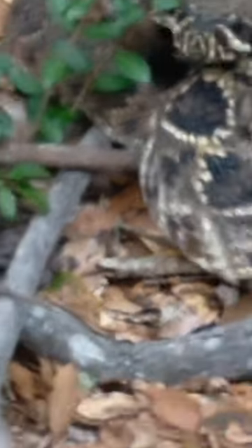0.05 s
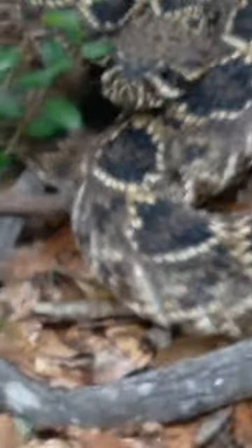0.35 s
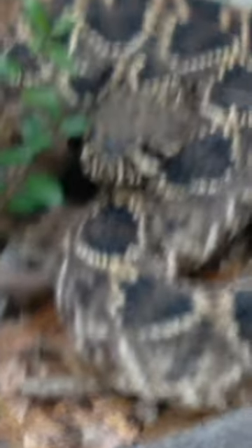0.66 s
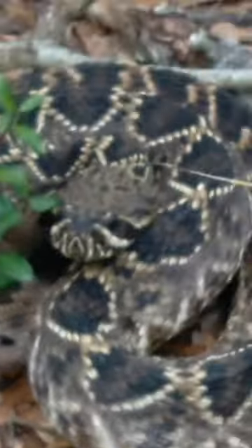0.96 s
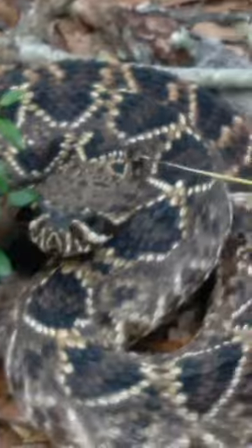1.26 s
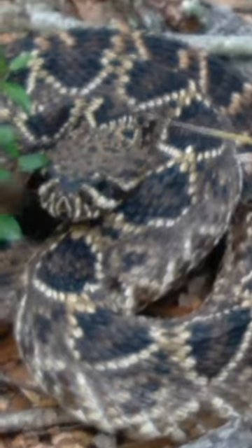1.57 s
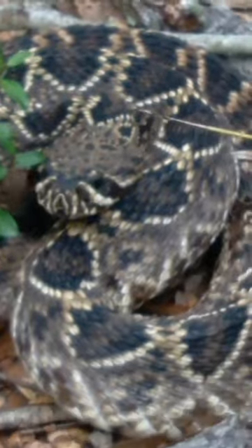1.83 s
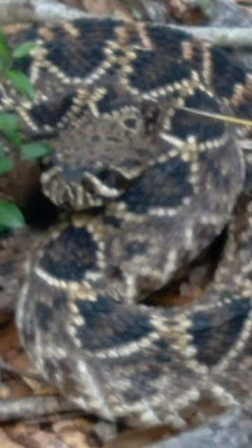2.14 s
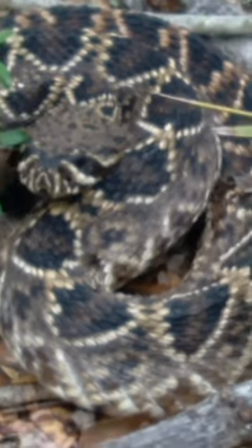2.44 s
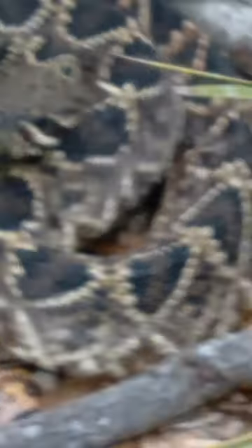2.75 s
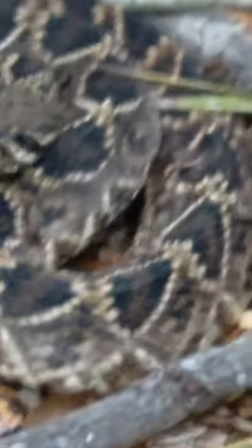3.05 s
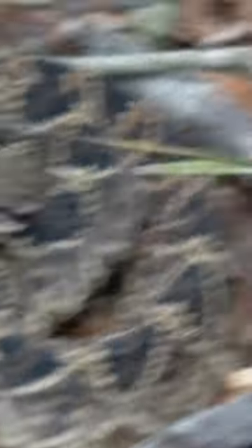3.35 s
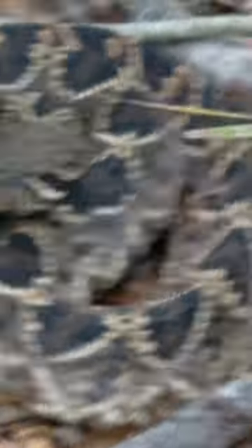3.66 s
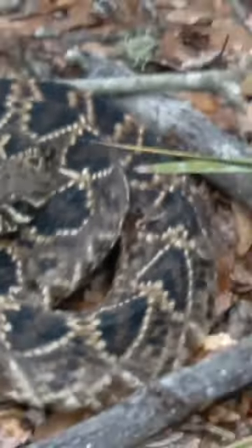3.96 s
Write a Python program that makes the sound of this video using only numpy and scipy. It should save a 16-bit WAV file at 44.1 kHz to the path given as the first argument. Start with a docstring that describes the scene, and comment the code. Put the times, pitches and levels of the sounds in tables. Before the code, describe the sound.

Close up outdoors, a rattlesnake's dry, hissing rattle buzzes without pause, easing slightly as it goes. Two short snaps and a faint leaf rustle come at the start; later a hand knocks and rubs the microphone.

```python
"""Outdoors in dry leaf litter, a hand-held microphone close to a coiled rattlesnake.
Each shake of the tail throws the hollow horny segments together twice: a fizz of tiny clicks
that ring in the shells. Litter snaps, crackles and rustles; a faint hum hangs far off.
Near 3 s the microphone swings round to another side, and the hand bumps and rubs its housing."""
import sys
import numpy as np
from scipy import signal
from scipy.fft import rfft, irfft
from scipy.io import wavfile

SR = 44100
rng = np.random.default_rng(int(sys.argv[2]) if len(sys.argv) > 2 else 0)


def store_wav(level_fs):
    """Save 16-bit WAV to argv[1]."""
    pcm = np.round(np.clip(np.atleast_2d(level_fs), -1, 1) * 32767)
    wavfile.write(sys.argv[1], SR, pcm.T.astype(np.int16))


N = 176400
T = np.arange(N) / SR


def rattle():
    """The rattle, close up: segments click under each stroke; the colour shifts as the microphone moves."""
    # broad colour from the first position, and from the side: f/Hz, level/dB
    front_colour = [(600, -36), (1080, -16), (1400, -27), (1800, -25), (2500, -14.5), (2850, -18),
                    (3400, -9.5), (3850, -4), (5000, -2.5), (5700, -5), (7000, 2), (8100, 2), (9000, -3),
                    (12000, -17), (14000, -17), (15800, -17.5)]
    side_colour = [(580, -27), (790, -10), (1100, -26), (1700, -22.5), (2500, -12.5), (3300, -7),
                   (3900, -3), (4400, -4), (5300, -2.5), (6100, -8), (7300, 1.5), (8400, 3.5), (9800, -8),
                   (11700, -14.5), (12700, -11.5), (15800, -16.5)]
    # crossovers between four bands: f/Hz
    band_edges = [3453, 6320, 10300]
    # band levels: t/s, low/dB, middle/dB, treble/dB, top/dB
    band_levels = [(0, -63.5, -51.5, -42, -52), (.3, -61.5, -50, -48, -50), (.6, -61.5, -50.5, -49, -52.5),
                   (.8, -59, -50.5, -46, -51), (1.1, -59.5, -49.5, -47.5, -52.5),
                   (1.45, -62, -50.5, -50.5, -56), (1.9, -62.5, -50, -50.5, -56.5),
                   (2.2, -64, -49.5, -53, -62.5), (2.45, -71.5, -53, -55, -64),
                   (2.8, -70.5, -54, -58.5, -62.5), (3.08, -75, -59.5, -52.5, -61.5),
                   (3.19, -62.5, -52, -58.5, -65), (3.26, -60.5, -53.5, -51.5, -63),
                   (3.36, -66.5, -55, -56.5, -65), (3.55, -63.5, -55, -56.5, -63.5),
                   (3.75, -69.5, -56, -55, -60.5), (4, -81, -57.5, -54, -59)]
    mid_swing_s, swing_takes_s = 2.91, .29
    aside = np.clip((T - mid_swing_s) / swing_takes_s + .5, 0, 1)
    clicks = grains(per_s=12000, spread_db=5) * strokes() * clacks()
    clicks *= from_db(.6 * drift(per_s=16))  # slight surges
    clicks = scattered(clicks, unsteady=1 + 2.9 * aside, count=8)  # less steady after the swing
    rings = shells(clicks)
    buzz = (1 - aside) * rms_one(coloured(rings, front_colour))
    buzz += aside * rms_one(coloured(rings, side_colour))
    lowpassed = [below(buzz, hz, order=8) for hz in band_edges]
    bands = np.diff([np.zeros(N), *lowpassed, buzz], axis=0)
    buzz = sum(from_db(db) * rms_one(band) for db, band in zip(in_time(band_levels), bands))
    return sliding_dip(buzz)


def strokes():
    """Force on the segments: a strong and a weak stroke per shake, with a flutter beating against them."""
    # tail speed: t/s, shake rate/Hz
    tail_speed = [(0.0, 41.17), (0.12, 37.34), (0.25, 38.37), (0.4, 40.62), (0.6, 38.48), (0.8, 39.34),
                  (1.0, 38.74), (1.2, 38.4), (1.45, 37.45), (1.7, 37.64), (2.0, 37.2), (2.3, 37.46),
                  (2.6, 36.79), (2.9, 37.03), (3.2, 37.17), (3.6, 36.8), (4.0, 36.56)]
    # the two strokes of a shake: place/cycles, half width/cycles, relative level/dB
    stroke_pair = [(0.99, 0.15, 3), (0.46, 0.24, -2)]
    # flutter: t/s, depth/dB
    flutter_depth = [(0, .3), (1.2, .5), (1.5, 1.4), (3.5, 2.1)]
    flutter_hz, stroke_spread_db = 59.38, .7
    cycles = np.cumsum(in_time(tail_speed)[0]) / SR - .1
    force = from_db(-4.5)  # loose segments keep clicking between strokes
    for place, width, db in stroke_pair:
        phase = cycles - place + 1.5
        strengths = from_db(db + stroke_spread_db * rng.standard_normal(400))
        pulse = np.exp(-np.abs((phase % 1 - .5) / width) ** 3)
        force = force + strengths[phase.astype(int)] * pulse
    flutter_db = in_time(flutter_depth)[0] * np.cos(2 * np.pi * (flutter_hz * T + .45))
    return rms_one(force * from_db(flutter_db))


def clacks():
    """Brief extra force where the segments meet hard."""
    # harder strokes: t/s, lift/dB
    hard_strokes = [(.415, 3), (1.08, 3), (1.472, 1.5), (1.872, 3), (2.11, 8.5), (2.433, 4), (3.487, 6.5),
                    (3.54, 8)]
    return 1 + sum((from_db(db) - 1) * swell(s, span_s=.002) for s, db in hard_strokes)


def shells(clicks):
    """Clicks ring in the hollow segments; each resonance swells and fades as tail and microphone turn."""
    # segment resonances: f/Hz, width/Hz, lift/dB, strongest at t/s, fade/s
    modes = [(2470, 71, 4, 0.39, .3), (2630, 62, 9, 1.8, 0.46), (3030, 49, 7.5, 1.34, 0.94),
             (3724, 43, 6.5, 1.14, 0.7), (3640, 50, 6, 3.6, 0.37), (3876, 70, 7, 1.6, 2.9),
             (4040, 190, 10.5, 3.2, 0.15), (4040, 100, 5, 0.15, 0.16), (4190, 145, 8.5, 0.77, 0.47),
             (4694, 57, 2, .52, .15), (4843, 84, 7.5, 2.5, 1.9), (5060, 46, 12, 1, .35),
             (5140, 94, 10.5, 3.95, 0.19), (5250, 150, 8, 4, 1.5), (5880, 75, 10, 2.3, 0.33),
             (6200, 180, 9, 3.03, .15), (6600, 48, 7, 0.78, 0.25), (6804, 91, 15, 4.23, 0.2),
             (6820, 110, 9, 1.84, .6), (6900, 60, 14, .48, 0.13), (7330, 140, 12.5, 3.48, 0.22),
             (7660, 125, 8.5, 1.6, 1.4), (7660, 95, 8.5, 3.59, 0.12), (7900, 94, 5.5, 0.41, .2),
             (8000, 47, 10, 1.9, 0.66), (8190, 80, 11.5, 0.7, 0.68), (8430, 47, 12.5, 3.25, 0.17),
             (8527, 60, 6, 2, 0.37), (9300, 89, 7, 3.4, .3), (9200, 70, 6, 3.55, 0.27),
             (9259, 120, 9, 2.63, 0.25), (9200, 60, 6, 1.7, .5), (10700, 180, 13, 3.37, 0.22),
             (11470, 70, 15, 3.36, 0.3), (12187, 90, 12, 3.4, 0.25), (12575, 150, 10.5, 3.65, 0.41),
             (13150, 170, 11, 4.7, 0.28), (14500, 140, 12.5, 3.3, .38)]
    return clicks + sum((from_db(db) - 1) * swell(s, span_s) * resonance(clicks, hz, width_hz)
                        for hz, width_hz, db, s, span_s in modes)


def scattered(x, unsteady, count):
    """Twigs and leaves return weak, short echoes whose paths wander as the hand moves."""
    longest_s, echo_db = .004, -6
    echoes = np.zeros(N)
    for _ in range(count):
        polarity = rng.choice([-1, 1])
        delay_s = rng.uniform(.1003, 1) * longest_s
        wander_s = .00003 * unsteady * drift(per_s=2)
        echoes += polarity * np.interp(T - delay_s - wander_s, T, x)
    return x + from_db(echo_db) * echoes / np.sqrt(count)


def sliding_dip(x, width_hz=2000, block=256):
    """A slight treble lift turns into a broad phasing dip that slides down through the buzz."""
    # path of the dip: t/s, centre f/Hz, gain/dB
    glide = [(2.15, 9150, 2), (2.33, 7850, -5.5), (2.55, 6900, -2), (2.8, 5560, -5.5), (3.0, 4430, -1),
             (3.12, 4000, -4)]
    hz, db = in_time(glide)
    state, band = np.zeros(2), np.zeros(N)
    for i in range(0, N, block):
        band[i:i + block], state = signal.lfilter(*resonator(hz[i], width_hz), x[i:i + block], zi=state)
    return x + (from_db(db) - 1) * band


def snaps():
    """Dry fibres in the litter break in a short burst: a bright crack over a woody ring."""
    # breaks: t/s, peak/dB, t60/s, wood against crack/dB
    breaks = [(0.0976, -21.5, 0.034, -6), (.8831, -11, 0.0051, -12.5), (0.8843, -19, 0.0077, -7.5)]
    # colours of the crack and of the wood: f/Hz, level/dB
    crack_colour = [(4000, -37), (5800, -26), (7300, -5.5), (8800, 1), (10500, -6), (13000, -16),
                    (15800, -18)]
    wood_colour = [(150, -53), (400, -19), (1000, -3.5), (1750, 2), (2100, -6), (2550, 9), (3100, 1),
                   (3950, 4), (4800, 5), (6000, -10.5)]
    out = np.zeros(N)
    for s, db, t60, wood_db in breaks:
        burst = noise_burst(s, t60)
        crack = rms_one(coloured(burst, crack_colour))
        wood = from_db(wood_db) * rms_one(coloured(burst, wood_colour))
        out += peak_at(crack + wood, db)
    return out


def crackles(width_hz=1260):
    """Dead leaves buckle: short, dull bursts, each around its own pitch."""
    # single leaves: t/s, peak/dB, f/Hz
    leaves = [(0.134, -42, 935), (.141, -51, 1150), (0.25, -47, 1500), (0.298, -52, 905),
              (.378, -44.5, 1620), (.414, -48, 2210), (0.693, -49, 780)]
    out = np.zeros(N)
    for s, db, hz in leaves:
        leaf = resonance(noise_burst(s, t60=.029), hz, width_hz)
        out += peak_at(resonance(leaf, hz, width_hz), db)
    return out


def handling():
    """Handling noise: soft knocks ring briefly in the microphone housing, over the rumble of the grip. The
    earliest short tap, at 0.32 s, is a leaf crackling in the litter."""
    # a leaf crackle at 0.32 s, then knocks of the hand: t/s, peak/dB, f/Hz, t60/s
    knocks = [(0.319, -42.5, 437, 0.0093), (2.859, -45, 700, 0.0015), (2.898, -31, 97.4, 0.088),
              (2.976, -35.5, 99, 0.045), (3.020, -42, 160, 0.04), (3.105, -44, 275, 0.02),
              (3.6007, -33.5, 900, 0.00098), (3.673, -37.5, 260, 0.011), (3.7215, -17, 356, 0.02),
              (3.83, -31, 133, 0.015), (3.856, -27, 577, 0.0078), (3.958, -37, 262, 0.026)]
    # rumble of the shifting grip: t/s, level/dB
    grip_level = [(2.7, -76), (2.85, -57.5), (2.92, -45.5), (2.99, -49), (3.08, -52), (3.22, -72.5),
                  (3.58, -67.5), (3.61, -39.5), (3.65, -58), (3.73, -47), (3.79, -51), (3.87, -37.5),
                  (3.94, -42.5), (4, -43)]
    # its colour: f/Hz, level/dB
    grip_colour = [(20, -39), (45, -14), (70, 2.5), (100, -6), (150, -13.5), (300, -26), (700, -45.5),
                   (2000, -68)]
    out = from_db(in_time(grip_level)[0]) * rms_one(coloured(rng.standard_normal(N), grip_colour))
    for s, db, hz, t60 in knocks:
        ring = np.sin(2 * np.pi * hz * (T - s)) * decay(s, t60)
        soft_contact = signal.butter(2, 2.53 * hz, fs=SR)  # dulls the onset
        out += peak_at(signal.lfilter(*soft_contact, ring), db)
    return out


def rustle():
    """The litter rustles softly: a dense patter of tiny ticks."""
    # rustle: t/s, level/dB
    level = [(0, -57.5), (.15, -55), (.45, -58.5), (.8, -62.5), (1.3, -70.5), (2.2, -73.5), (2.9, -85),
             (3.25, -66.5), (3.55, -84), (4, -71)]
    # its colour: f/Hz, level/dB
    colour = [(150, -8), (300, -4.5), (550, -3), (1400, -1.5), (1900, -7), (2600, -5.5), (4500, -14)]
    ticks = grains(per_s=2500, spread_db=1.5)
    return from_db(in_time(level)[0]) * rms_one(coloured(ticks, colour))


def still_air(level_db=-70):
    """The outdoor bed: faint, steady, dark noise."""
    # background colour: f/Hz, level/dB
    colour = [(20, -40), (40, -18), (70, -14.5), (150, -2.5), (260, -19), (375, -9), (450, -15), (750, -14),
              (1070, -16.5), (2000, -39), (5000, -37)]
    return from_db(level_db) * rms_one(coloured(rng.standard_normal(N), colour))


def distant_hum(pitch_hz=187.8, wander_hz=1.67):
    """Far off, one low tone wavers slightly in pitch."""
    # hum at the microphone: t/s, level/dB
    level = [(0, -72), (.35, -70.5), (.6, -61.5), (.85, -63.5), (1.2, -72.5), (2.6, -70), (4, -69.5)]
    hz = pitch_hz + wander_hz * drift(per_s=10)
    return from_db(in_time(level)[0]) * rms_one(np.sin(2 * np.pi * np.cumsum(hz) / SR))


def from_db(db):
    """Decibels to gain."""
    return 10 ** (np.asarray(db) / 20)


def rms_one(x):
    """Scale to rms 1."""
    return x / np.sqrt(np.mean(x ** 2) + 1e-20)


def peak_at(x, db):
    """Scale to a peak level."""
    return from_db(db) * x / np.abs(x).max()


def in_time(rows):
    """One curve per column after the times, joined by straight lines."""
    s, *columns = np.transpose(rows)
    return [np.interp(T, s, column) for column in columns]


def swell(s, span_s):
    """Bell curve that reaches 1 at time s."""
    return np.exp(-((T - s) / span_s) ** 2)


def decay(s, t60):
    """Envelope that opens at time s and falls 60 dB every t60 seconds."""
    return (T >= s) * from_db(-60 * np.clip((T - s) / t60, 0, 10))


def noise_burst(s, t60):
    """White noise that dies away from time s."""
    return rng.choice([-1, 1], N) * decay(s, t60)


def drift(per_s):
    """Slow random wander; rms 1."""
    knots = rng.standard_normal(int(N / SR * per_s) + 2)
    return rms_one(np.interp(T * per_s, np.arange(len(knots)), knots))


def grains(per_s, spread_db):
    """Random clicks of uneven size; rms 1."""
    sizes = from_db(spread_db * np.minimum(rng.standard_normal(N), 2.8)) * rng.choice([-1, 1], N)
    return rms_one(sizes * (rng.random(N) < per_s / SR))


def coloured(x, points, size=8192):
    """Causal (minimum-phase) filter through points of f/Hz, level/dB."""
    hz, db = np.transpose(points)
    grid_hz = np.maximum(np.fft.rfftfreq(size, 1 / SR), 1)
    gain = from_db(np.interp(np.log(grid_hz), np.log(hz), db))
    cepstrum = irfft(np.log(gain))
    cepstrum[1:size // 2] *= 2
    cepstrum[size // 2 + 1:] = 0
    return signal.fftconvolve(x, irfft(np.exp(rfft(cepstrum))))[:N]


def resonator(hz, width_hz):
    """Coefficients of a two-pole band-pass with gain 1 at its peak."""
    r = np.exp(-np.pi * width_hz / SR)
    return np.array([1, 0, -1]) * (1 - r * r) / 2, [1, -2 * r * np.cos(2 * np.pi * hz / SR), r * r]


def resonance(x, hz, width_hz):
    """Ring x through one resonator."""
    return signal.lfilter(*resonator(hz, width_hz), x)


def below(x, hz, order):
    """Low-pass without delay."""
    return signal.sosfiltfilt(signal.butter(order, hz, fs=SR, output="sos"), x)


def scene():
    """All sources at one microphone, in mono."""
    return (rattle() + snaps() + crackles() + handling() + rustle() + still_air() + distant_hum())[None]


def record(dry):
    """A low cut takes out the deepest bass, and the top is cut steeply."""
    low_cut_hz, high_cut_hz = 48, 15850
    dry = signal.sosfilt(signal.butter(2, low_cut_hz, "high", fs=SR, output="sos"), dry)
    return signal.sosfilt(signal.ellip(12, .2, 70, high_cut_hz, fs=SR, output="sos"), dry)


dry = scene()
out = record(dry)
store_wav(out)
```